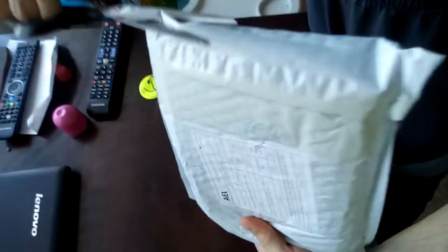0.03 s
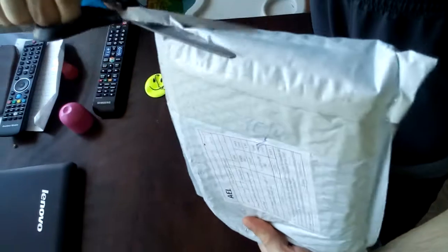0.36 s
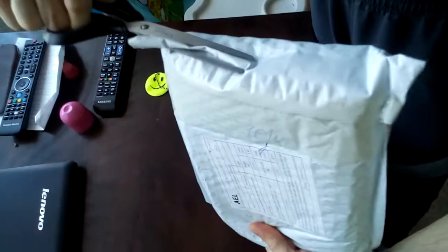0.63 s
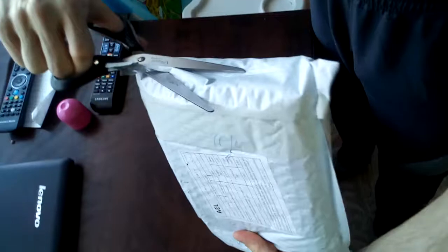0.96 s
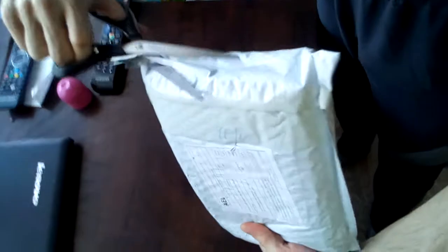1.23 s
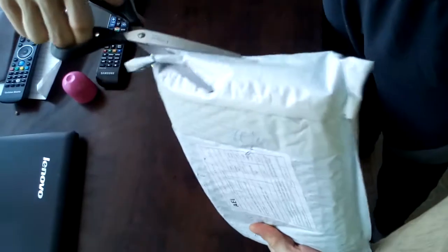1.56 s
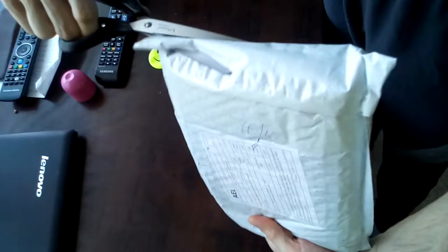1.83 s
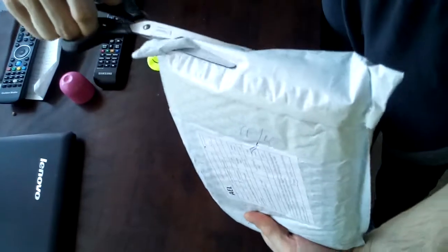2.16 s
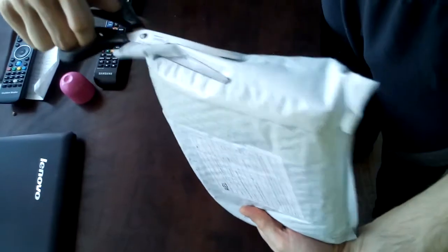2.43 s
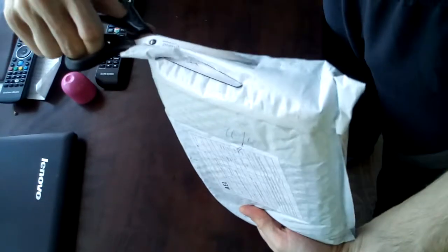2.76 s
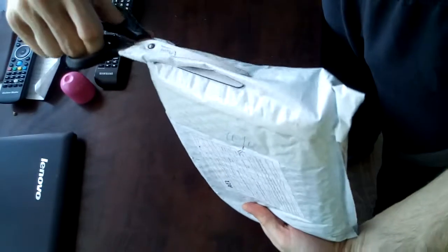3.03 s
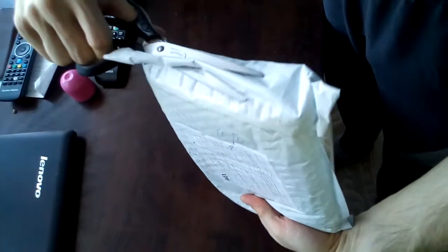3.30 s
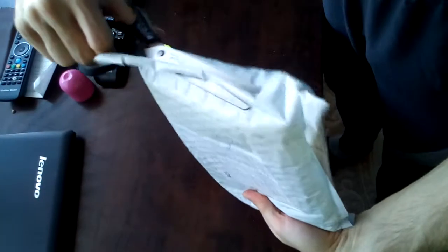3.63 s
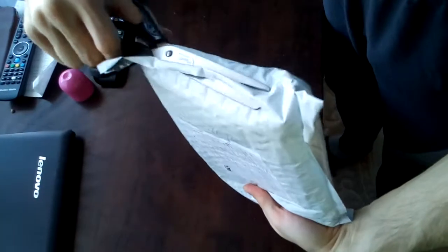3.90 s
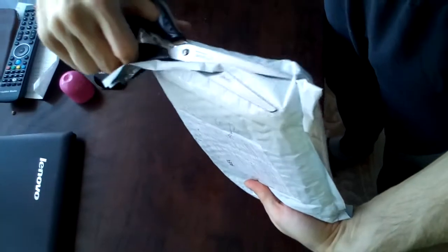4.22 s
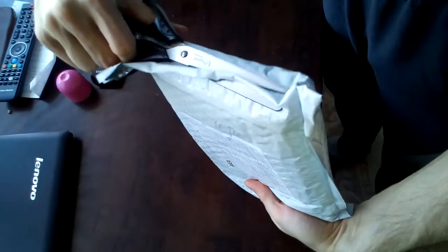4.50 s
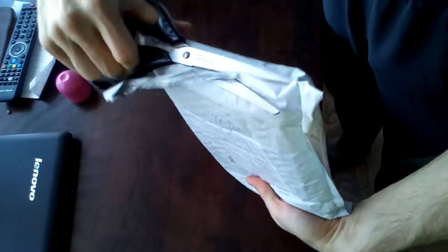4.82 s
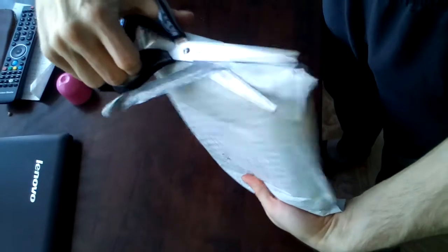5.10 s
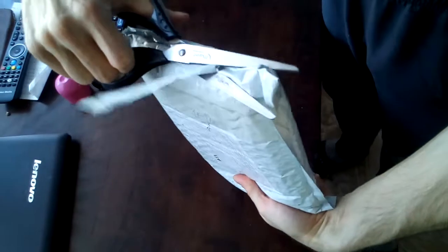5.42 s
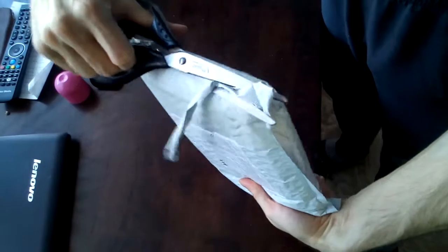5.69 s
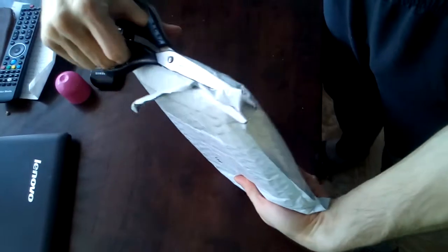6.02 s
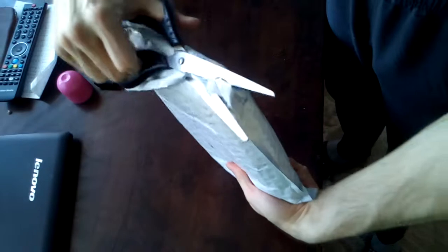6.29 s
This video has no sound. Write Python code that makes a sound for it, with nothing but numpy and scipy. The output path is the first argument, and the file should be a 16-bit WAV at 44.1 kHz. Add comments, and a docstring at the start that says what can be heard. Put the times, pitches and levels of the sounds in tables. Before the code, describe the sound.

Scissors cut a plastic bubble mailer close by, with sharp crinkling snaps, blade scrapes and a few hollow thumps.

```python
"""Scissors cut along the top of a plastic bubble mailer, held over a desk in a small, quiet room.
Creases snap through and ring the film, and the padded pouch buckles with hollow thumps. Between the snaps
tiny wrinkles crackle, the blades scrape the film and the pouch rubs in the hand. The edges fizz as they
bite; now and then the scissors knock softly or squeak, steel on steel. A close phone microphone adds
a sharp resonance near 6 kHz."""
import sys
import numpy as np
from scipy import signal
from scipy.fft import rfft, irfft
from scipy.io import wavfile
from scipy.ndimage import uniform_filter1d

SR = 44100
rng = np.random.default_rng(int(sys.argv[2]) if len(sys.argv) > 2 else 0)


def dump(signal):
    """Clip the signal to [-1, 1] and save it as 16-bit WAV at the path in sys.argv[1]."""
    limited = np.clip(np.atleast_2d(signal).T, -1, 1)
    pcm = np.round(limited * 32767).astype(np.int16)
    wavfile.write(sys.argv[1], SR, pcm)


N = 280035
TIME = np.arange(N) / SR


def undb(db):
    """Decibels to gain."""
    return 10 ** (np.asarray(db) / 20)


def response(points, size=2048):
    """Minimum-phase impulse response of a (freq_hz, gain_db) curve."""
    hz, db = np.transpose(points)
    grid_hz = np.maximum(np.arange(size // 2 + 1) * SR / size, 1)
    gain = undb(np.interp(np.log(grid_hz), np.log(hz), db))
    cepstrum = irfft(np.log(gain))
    cepstrum[1:size // 2] *= 2
    cepstrum[size // 2 + 1:] = 0
    return irfft(np.exp(rfft(cepstrum)))


def ring(x, impulse):
    """Pass x through an impulse response."""
    return signal.fftconvolve(x, impulse)[:len(x)]


def coloured_noise(impulse):
    """White noise through an impulse response, at rms 1."""
    noise = ring(rng.standard_normal(N), impulse)
    return noise / np.sqrt(np.mean(noise ** 2))


def decay(t, t60_s):
    """An envelope that falls 60 dB in t60_s."""
    return np.exp(-np.log(1000) * t / t60_s)


def add(out, start_s, sound):
    """Mix a sound in at start_s."""
    i = int(np.clip(start_s * SR, 0, N - 1))
    out[i:i + len(sound)] += sound[:N - i]


def flicker(rate_hz):
    """A smooth random wobble between -1 and 1."""
    knots = rng.standard_normal(4096)
    return np.tanh(np.interp(TIME * rate_hz, np.arange(len(knots)), knots) * np.sqrt(1.5))


# Colour of the steady background, low rumble and high hiss fading above 15 kHz: freq_hz, gain_db
BACKGROUND_EQ = [(25, -16), (55, -3), (100, 1.5), (150, 2), (220, -4.5), (400, -6), (800, -15),
                 (2000, -22.5), (5000, -23.5), (9500, -8), (15300, -10.5), (16500, -35)]
def background():
    """A faint, steady bed of low rumble and high hiss."""
    return undb(-63) * coloured_noise(response(BACKGROUND_EQ))


# Pushes, cuts and shifts of grip: start_s, length_s, crackle_db, scrape_db, rub_db, swell_db
STROKES = [(0.005, .3, -50, -53, -65.5, -9), (0.373, 0.037, -52, -53, -80, 0),
           (0.418, 0.068, -51, -42, -66, 1.5), (0.5, 0.11, -54.5, -51, -62.5, 4.5),
           (0.651, 0.16, -59, -54, -65.5, -7), (0.763, 0.12, -51.5, -49.5, -68, 13),
           (0.861, 0.055, -60, -50, -58, 9.5), (1.013, 0.053, -64, -70, -79, 13),
           (1.205, 0.13, -59, -59, -78, 9.5), (1.454, 0.22, -62.5, -68, -79, -2),
           (1.588, 0.12, -60, -56, -68, 9), (1.781, 0.32, -69, -53.5, -76, 1.5),
           (2.05, 0.074, -61.5, -55.5, -62.5, 0), (2.139, 0.049, -53, -47.5, -63.5, 1.5),
           (2.266, 0.042, -63, -66, -71, 2), (2.437, 0.09, -47, -50, -62.5, 9.5),
           (2.557, 0.023, -52, -50.5, -60, -0.5), (2.68, .09, -59, -60.5, -67.5, 1.5),
           (2.782, .18, -57, -54.5, -67.5, 3.5), (2.959, 0.069, -51.5, -56.5, -58.5, 0),
           (3.189, 0.07, -46, -46, -59, 4.5), (3.385, 0.067, -54, -72, -76.5, 16),
           (3.474, 0.12, -46, -48, -58.5, -8), (3.678, 0.1, -42.5, -44, -51.5, 3),
           (3.86, 0.078, -62, -63.5, -76, 9), (3.918, 0.071, -45, -51.5, -58.5, -6),
           (4.131, 0.051, -49, -50, -70.5, 9), (4.197, 0.057, -43, -45.5, -50.5, -5),
           (4.388, 0.061, -73, -70, -87, 2), (4.46, 0.097, -47, -47, -59, -2.5),
           (4.601, 0.038, -63, -50, -92, -6), (4.777, 0.1, -55.5, -55.5, -68, 16),
           (4.955, 0.026, -55, -65, -91, 9), (5.032, 0.17, -63, -54.5, -58.5, -1.5),
           (5.163, 0.029, -34, -35, -41, -25), (5.366, 0.16, -63.5, -96, -92, -6),
           (5.518, 0.081, -63, -56, -76, -2), (5.607, 0.081, -47.5, -51.5, -67, 3),
           (5.749, 0.025, -60, -55.5, -75, 2.5), (5.861, 0.1, -58, -68.5, -78, 5),
           (6.086, 0.069, -60.5, -65.5, -76, 7), (6.151, 0.15, -43, -49.5, -71, -5.5)]
# Floor while the hand only holds the mailer: crackle_db, scrape_db, rub_db
HOLDING_DB = [-86.5, -77, -84.5]
# Release after a stroke: crackle_db_per_s, scrape_db_per_s, rub_db_per_s
RELEASE_DB_PER_S = [241, 235, 215]
def stroke_envelope(layer, attack_s=0.018):
    """One friction layer's envelope in dB: each stroke takes hold, swells or sags, then relaxes."""
    power = np.full(N, undb(HOLDING_DB[layer]) ** 2)
    t = TIME[:SR]
    attack = np.minimum(t / attack_s, 1)
    for start_s, length_s, *levels_db, swell_db in STROKES:
        held_db = levels_db[layer] + swell_db * (np.minimum(t / length_s, 1) - 0.5)
        release_db = RELEASE_DB_PER_S[layer] * np.maximum(t - length_s, 0)
        add(power, start_s, (attack * undb(held_db - release_db)) ** 2)
    return 10 * np.log10(power)


def friction(eq, level_db, per_s, spread_db, catch_db, catch_hz):
    """Tiny slips of unequal size, in bunches as the film catches and lets go."""
    happens = rng.random(N) < per_s / SR
    sizes = undb(spread_db * np.minimum(rng.exponential(size=N), 4))
    slips = happens * sizes * rng.choice([-1, 1], N) * undb(catch_db * flicker(catch_hz))
    sound = ring(slips, response(eq))
    # the hand's push sets the power that the slips share over each 60 ms
    power = uniform_filter1d(sound ** 2, int(0.06 * SR))
    return sound / np.sqrt(power + 1e-3 * np.mean(sound ** 2)) * undb(level_db)


def unit_hit(sound):
    """Give a transient the energy of 2 ms at rms 1."""
    return sound * np.sqrt(0.002 * SR / np.sum(sound ** 2))


def stray_ticks(eq, level_db, per_s, spread_db, scatter_db, hop=64):
    """Single wrinkles flip on their own, each with its own colour."""
    out = np.zeros(N)
    hz, db = np.transpose(eq)
    happens = rng.random(N // hop) < per_s * hop / SR
    chance = rng.standard_normal((len(happens), len(hz) + 1))
    for slot in np.flatnonzero(happens):
        colour = np.column_stack([hz, db + scatter_db * chance[slot, 1:]])
        tick_db = level_db[slot * hop] + spread_db * np.tanh(chance[slot, 0])
        add(out, slot * hop / SR, undb(tick_db) * unit_hit(response(colour, size=256)))
    return out


# Bright tick of a crease: freq_hz, gain_db
CREASE_EQ = [(1000, -55.5), (2800, -18), (4200, 5), (5500, 10.5), (7000, 4.5), (16000, -20)]
def wrinkle_crackle(crackle_db):
    """The harder the film is worked, the more wrinkles give way each second."""
    per_s = 650 * undb(0.83 * (crackle_db + 54.5))
    crackle = friction(CREASE_EQ, crackle_db - 11, per_s, spread_db=-1.5, catch_db=-2.5, catch_hz=100)
    strays = stray_ticks(CREASE_EQ, 0.55 * crackle_db - 27.5, per_s=45, spread_db=4, scatter_db=6.5)
    return crackle + strays


# Broad crinkle of the open film: freq_hz, gain_db
FILM_EQ = [(300, -22), (750, -13.5), (1250, 3), (1600, -3.5), (2100, -0.5), (2800, -2), (3300, -4.5),
           (4500, 1.5), (6000, -9.5), (16000, -3.5)]
# Narrow rasp of the sliding blade: freq_hz, gain_db
BLADE_EQ = [(400, -45), (800, -24.5), (1200, -26.5), (1650, -12), (2130, -1), (2350, -5.5), (2650, -1.5),
            (2950, -4), (3300, -7.5), (4100, -14), (4600, -15), (6000, -19), (16000, -25)]
def blade_scrape(scrape_db, rub_db):
    """A freely sliding blade rasps; when it drags the pouch along, the open film crinkles instead."""
    strays = stray_ticks(FILM_EQ, 0.58 * scrape_db - 26, per_s=18, spread_db=16, scatter_db=-11.5)
    rasp = friction(BLADE_EQ, scrape_db - 0.5, per_s=1500, spread_db=2, catch_db=3.5, catch_hz=70)
    crinkle = friction(FILM_EQ, scrape_db - 0.5, per_s=700, spread_db=1, catch_db=7, catch_hz=90)
    drag = 1 / (1 + undb(scrape_db - rub_db - 10.5))
    return strays + np.sqrt(1 - drag) * rasp + np.sqrt(drag) * crinkle


# Hollow body of the padded pouch: freq_hz, gain_db
POUCH_EQ = [(60, -19), (150, -7), (240, -2.5), (330, -1.5), (450, 0.5), (520, -3.5), (600, -1.5),
            (750, -12), (950, -5.5), (1250, -3.5), (1600, -7), (2500, -13), (6000, -45.5)]
def pouch_rub(rub_db):
    """The pouch slips in the hand with a dull rustle."""
    return friction(POUCH_EQ, rub_db + 0.5, per_s=700, spread_db=2.5, catch_db=-1.5, catch_hz=26)


def snap(eq, pitch_hz, focus_db, settle_s, chatter, size=1024):
    """One kick, then a brief chatter; the size of the flipping patch favours the octave at pitch_hz."""
    hz, db = np.transpose(eq)
    colour_db = db - focus_db * np.minimum(np.log2(hz / pitch_hz) ** 2, 2)
    force = chatter * rng.standard_normal(size) * np.exp(-(TIME[:size] / settle_s) ** 2)
    force[0] += 1
    return unit_hit(ring(force, response(np.column_stack([hz, colour_db]), size)))


def crease_snap(tick_db, film_db, pitch_hz):
    """A flipping crease ticks and rings the film around it; each part has its own trim."""
    tick = snap(CREASE_EQ, pitch_hz=5550, focus_db=5.5, settle_s=0.0011, chatter=0.47)
    film = snap(FILM_EQ, pitch_hz, focus_db=11.5, settle_s=0.0029, chatter=0.12)
    return undb(tick_db - 5.5) * tick + undb(film_db - 2.43) * film


# The featured crease snaps: start_s, tick_db, film_db, pitch_hz
BIG_SNAPS = [(0.0097, -43, -38, 2000), (0.0194, -34.5, -33, 3020), (0.0343, -32, -24.5, 3100),
             (0.062, -45, -27.5, 2770), (0.096, -31.5, -38, 3600), (0.197, -39, -42, 2720),
             (0.2444, -35.5, -39, 2170), (0.2766, -48, -38, 3760), (0.3852, -35, -60, 3100),
             (0.399, -28, -32, 3730), (0.406, -34, -62, 3300), (0.429, -31, -37, 3020),
             (0.595, -49, -30, 2760), (0.606, -45, -32.5, 3100), (0.669, -63, -27, 2900),
             (0.7605, -30.5, -29, 3570), (0.9157, -56, -31, 2330), (0.927, -61, -45, 2600),
             (1.061, -52, -60, 2600), (1.5548, -50, -53, 4100), (1.6344, -37.5, -47, 3000),
             (1.6905, -30.5, -28, 2550), (1.7843, -49, -30.5, 3570), (2.0784, -57, -40.5, 1680),
             (2.1604, -43, -43, 3000), (2.2078, -38, -44, 3100), (2.4071, -46, -50.5, 4000),
             (2.435, -39, -50.5, 3900), (2.492, -26.5, -34.5, 3100), (2.5056, -27.5, -30.5, 2700),
             (2.5412, -53, -32.5, 2400), (2.5671, -25, -22.5, 2760), (2.805, -49, -37.5, 2600),
             (2.8326, -38, -49, 3400), (2.9825, -55, -36.5, 1560), (3.0233, -45, -41.5, 3260),
             (3.213, -33.5, -35, 2300), (3.398, -45.5, -61, 2400), (3.4705, -56, -36, 2730),
             (3.491, -28, -54, 3170), (3.5655, -21.5, -29.5, 2320), (3.7024, -34, -28, 2050),
             (3.7514, -44, -39, 2500), (3.7821, -38, -21, 2380), (3.8443, -31.5, -38.5, 3900),
             (3.8614, -39, -45, 2790), (3.927, -27, -26, 3220), (3.9588, -29.5, -32, 3300),
             (4.017, -36.5, -47.5, 3300), (4.1503, -27.5, -34, 3300), (4.2286, -44, -31, 1420),
             (4.275, -37, -38.5, 2100), (4.2811, -25.5, -34, 4200), (4.392, -33.5, -41.5, 4040),
             (4.505, -38.5, -36.5, 2080), (4.562, -24.5, -24, 3140), (4.659, -28, -33, 3700),
             (4.7887, -34, -46, 3200), (4.9512, -39, -42, 3300), (5.0567, -27, -19, 2400),
             (5.059, -19, -26, 2600), (5.1584, -68, -31, 1280), (5.1687, -26, -23, 2500),
             (5.535, -22.5, -32.5, 2530), (5.5394, -30.5, -30.5, 2260), (5.626, -26.5, -27, 2570),
             (5.6314, -58, -27, 1660), (5.6578, -34, -38, 2700), (5.6737, -21, -26.5, 2680),
             (5.7647, -41, -54, 3200), (5.7858, -49, -39, 2710), (5.952, -39, -45.5, 3000),
             (6.2266, -23.5, -28.5, 2720)]
def big_snaps():
    """Each big crease snaps through and sets off a weaker neighbour a moment later."""
    out = np.zeros(N)
    for start_s, tick_db, film_db, pitch_hz in BIG_SNAPS:
        add(out, start_s, crease_snap(tick_db, film_db, pitch_hz))
        delay_s, vary_db, octaves = rng.uniform(0, 0.034), rng.uniform(-2.5, 2.5), rng.uniform(-0.5, 0.5)
        neighbour = crease_snap(tick_db - 24 + vary_db, film_db - 16.5 + vary_db, pitch_hz * 2 ** octaves)
        add(out, start_s + delay_s, neighbour)
    return out


# Low hits from the pouch: start_s, level_db, pitch_hz
THUMPS = [(.0097, -44, 514), (0.244, -46, 316), (0.871, -49, 249), (0.898, -45, 212), (1.6911, -52.5, 400),
          (2.983, -47.5, 418), (3.025, -50.5, 475), (3.567, -52, 460), (3.7033, -37, 316),
          (3.7699, -40.5, 420), (3.7812, -44, 328), (4.2264, -38.5, 276), (5.0584, -36.5, 525),
          (5.168, -37, 420)]
def pouch_thumps(trim_db=4):
    """The padded pouch buckles with a hollow thump."""
    out = np.zeros(N)
    for start_s, level_db, pitch_hz in THUMPS:
        thump = snap(POUCH_EQ, pitch_hz, focus_db=9.5, settle_s=0.0083, chatter=0.047)
        add(out, start_s, undb(level_db + trim_db) * thump)
    return out


# Bright accents where the edges bite: start_s, level_db, fade_s
BITES = [(0.034, -31.5, 0.002), (0.402, -29, 0.0012), (0.596, -46, 0.021), (0.761, -33.5, 0.0019),
         (0.9, -38, 0.0023), (1.691, -38, 0.0025), (3.211, -44, 0.02), (3.751, -35.5, 0.0045),
         (4.151, -40.5, 0.0017), (4.211, -48, 0.0024), (4.469, -50, 0.0046), (4.562, -35.5, 0.00096),
         (4.788, -42.5, 0.011), (4.858, -42, 0.006), (4.875, -37.5, 0.0023), (5.636, -29.5, 0.0011),
         (5.952, -43, 0.0025), (6.227, -30.5, 0.0014)]
def cutting_fizz(crackle_db, trim_db=11.5):
    """The film fizzes where it is cut hard, and each bite spits a short burst of the same hiss."""
    push_db = 1.3 * np.minimum(crackle_db + 40, 0)
    envelope = undb(-57 + push_db + 7 * flicker(rate_hz=150))
    for start_s, level_db, fade_s in BITES:
        add(envelope, start_s, undb(level_db) * np.exp(-TIME[:SR // 5] / fade_s))
    hiss_eq = [(3000, -46.5), (6000, 9), (9000, 14.5), (12000, 2.5), (15000, 16)]
    return undb(trim_db) * envelope * coloured_noise(response(hiss_eq))


def small_snaps(crackle_db, per_s=15, spread_db=6, hop=512):
    """Lesser creases flip at chance moments, louder while the film is being worked."""
    out = np.zeros(N)
    slots_s = TIME[::hop]
    happens = rng.random(len(slots_s)) < per_s * hop / SR
    for start_s in slots_s[happens]:
        tick_db, film_db = rng.uniform(-spread_db, spread_db, 2) + [-44.5, -52]
        pitch_hz = 2800 * 2 ** rng.uniform(-0.5, 0.5)
        push_db = 0.83 * (crackle_db[int(start_s * SR)] + 52)
        add(out, start_s, undb(push_db) * crease_snap(tick_db, film_db, pitch_hz))
    return out


# Soft knocks of the scissors: start_s, pitch_hz, level_db, t60_s
KNOCKS = [(2.541, 1120, -30, 0.015), (3.185, 1080, -48.5, 0.072), (5.024, 1190, -39.5, 0.022),
          (5.533, 1150, -43, 0.026), (5.63, 1154, -31.5, 0.033)]
def scissor_knocks(contact_s=0.0018):
    """A soft contact rings one short note, damped by the fingers."""
    out, t = np.zeros(N), TIME[:SR // 5]
    attack = 1 - np.exp(-(t / contact_s) ** 2)
    for start_s, pitch_hz, level_db, t60_s in KNOCKS:
        add(out, start_s, undb(level_db) * attack * np.sin(2 * np.pi * pitch_hz * t) * decay(t, t60_s))
    return out


# Swells of steel sliding on steel: peak_s, half_length_s, level_db
SQUEAKS = [(4.477, 0.0034, -41.5), (5.935, 0.037, -65.5)]
# Ringing modes of a blade: pitch_hz, t60_s, gain_db
BLADE_MODES = [(1912, 0.048, 16), (5150, 0.038, -4)]
def blade_squeaks():
    """One blade bows the other and makes its modes sing."""
    bow, t = np.zeros(N), TIME[:SR // 5]
    for peak_s, half_length_s, level_db in SQUEAKS:
        bow += undb(level_db) * np.exp(-0.5 * ((TIME - peak_s) / half_length_s) ** 2)
    steel = sum(undb(db) * np.sin(2 * np.pi * hz * t) * decay(t, t60_s) for hz, t60_s, db in BLADE_MODES)
    return bow * coloured_noise(steel)


def room(x, wet_db, t60_s, predelay_s):
    """The desk and near walls answer within milliseconds and die away quickly."""
    t = TIME[:SR // 2]
    fade_in = np.clip(t / predelay_s - 1, 0, 1)
    tail = rng.standard_normal(len(t)) * decay(t, t60_s) * fade_in
    return x + undb(wet_db) * ring(x, tail / np.sqrt(np.sum(tail ** 2)))


def scene():
    """The mailer and the scissors in a tight room, over a quiet background; mono."""
    bed = background()
    crackle_db, scrape_db, rub_db = (stroke_envelope(layer) for layer in range(3))
    texture = wrinkle_crackle(crackle_db) + blade_scrape(scrape_db, rub_db) + pouch_rub(rub_db)
    hits = big_snaps() + pouch_thumps() + small_snaps(crackle_db)
    scissors = cutting_fizz(crackle_db) + scissor_knocks() + blade_squeaks()
    return (room(texture + hits + scissors, wet_db=-13, t60_s=0.13, predelay_s=0.0023) + bed)[None]


# Colour of the microphone port: freq_hz, gain_db
MICROPHONE_EQ = [(30, -3.5), (3500, 1), (4400, -1), (5100, 5.5), (5800, 12), (6300, 4), (6900, -8),
                 (8000, -19), (9500, -27.5), (11500, -27.5), (14000, -21), (15500, -26)]
def record(dry):
    """The microphone port rings near 6 kHz and dulls what lies above; a steep low-pass cuts at 16 kHz."""
    coloured = ring(dry[0], response(MICROPHONE_EQ))[None]
    low_pass = signal.ellip(8, 0.2, 70, 16000, fs=SR, output="sos")
    return signal.sosfilt(low_pass, coloured)


dry = scene()
out = record(dry)
dump(out)
```